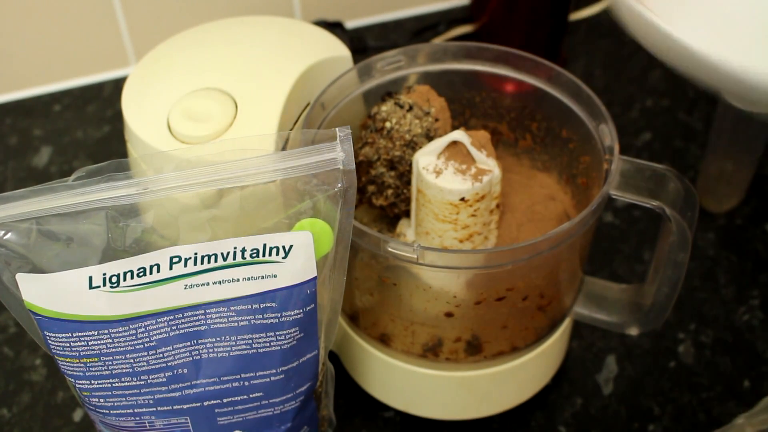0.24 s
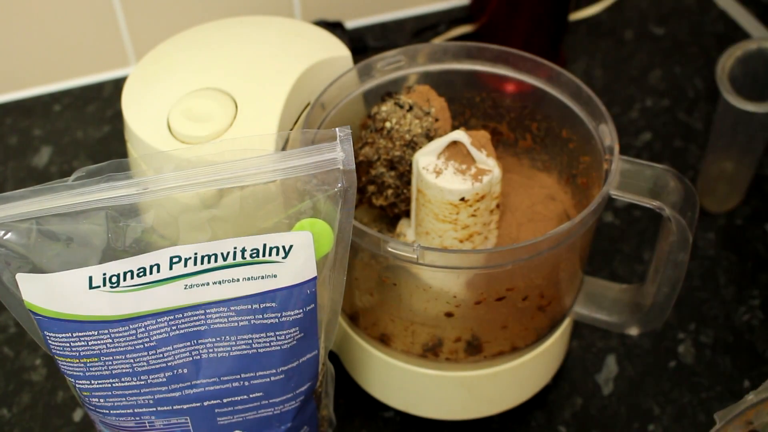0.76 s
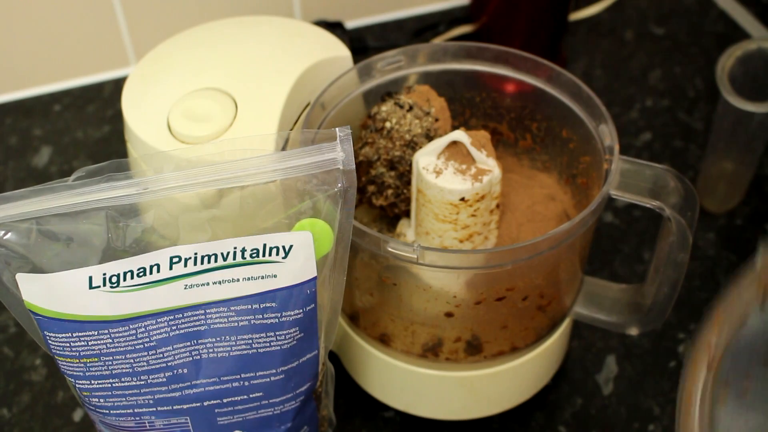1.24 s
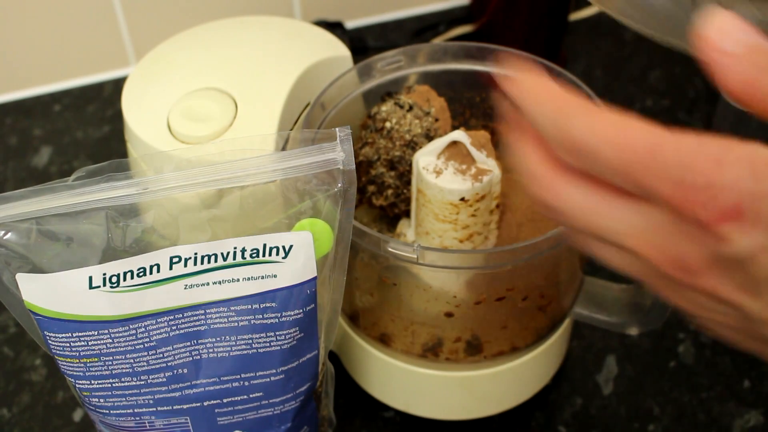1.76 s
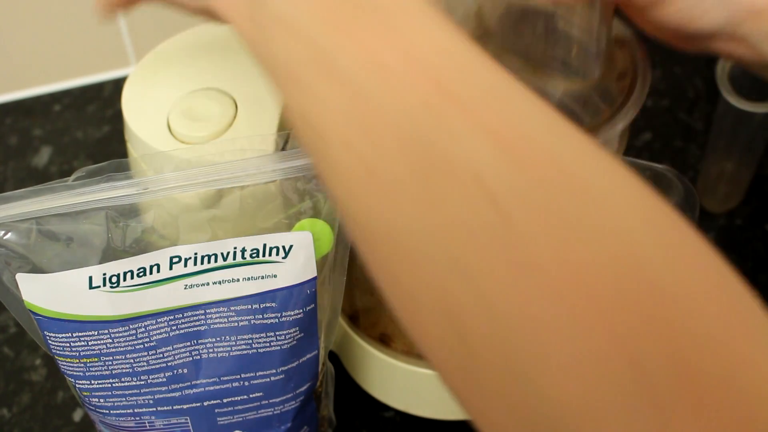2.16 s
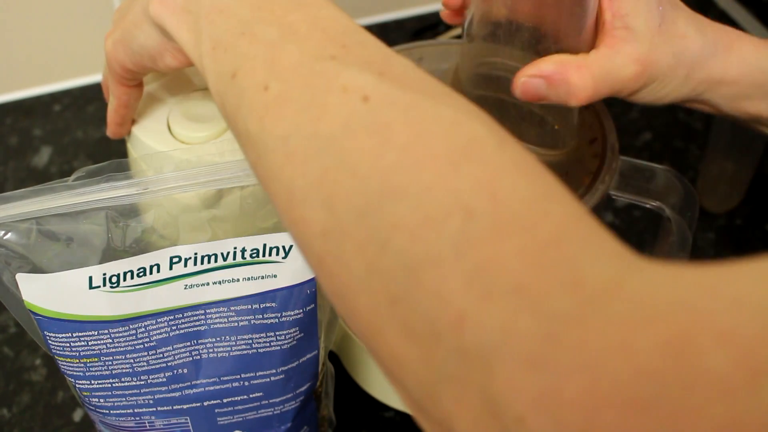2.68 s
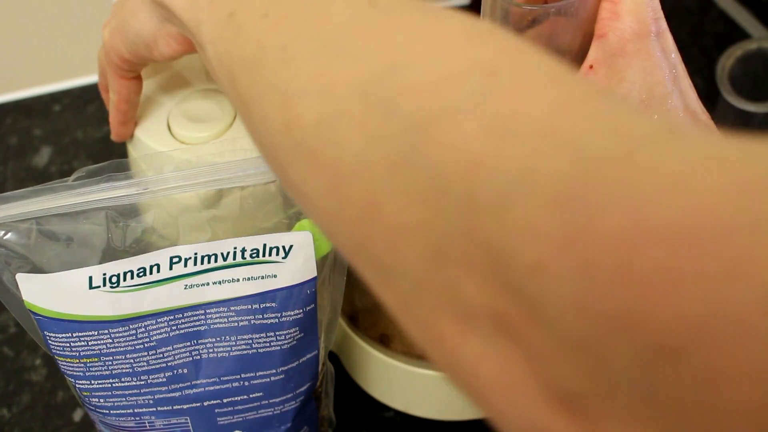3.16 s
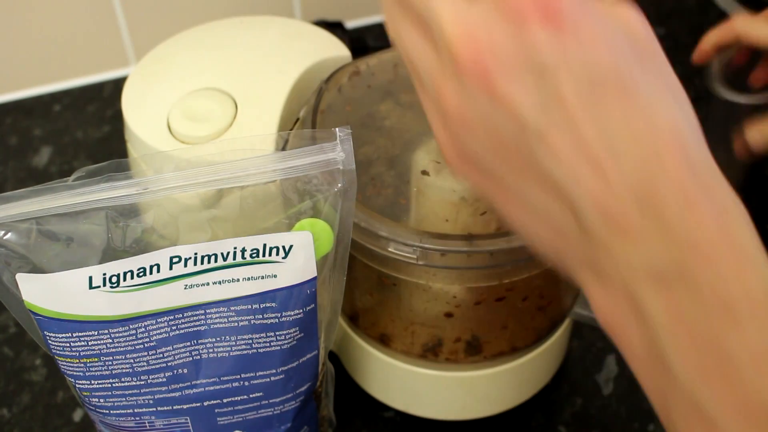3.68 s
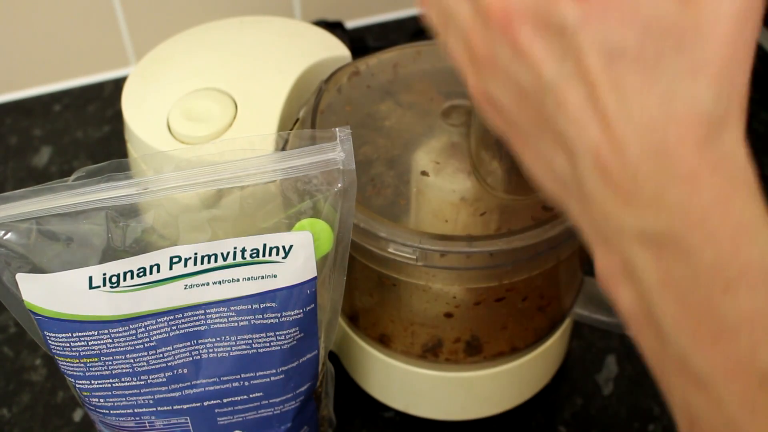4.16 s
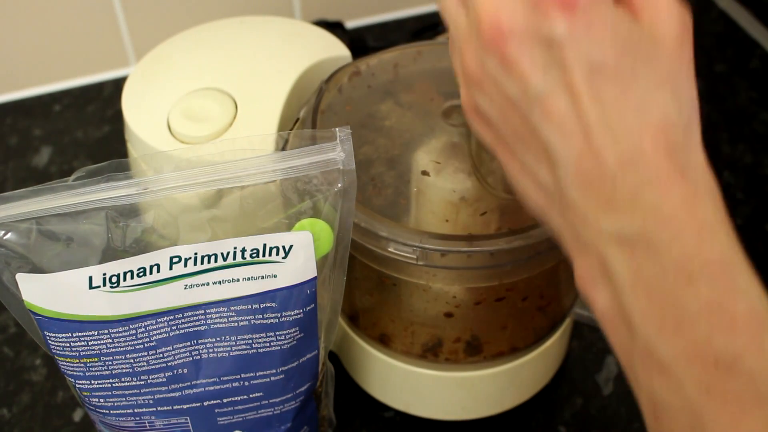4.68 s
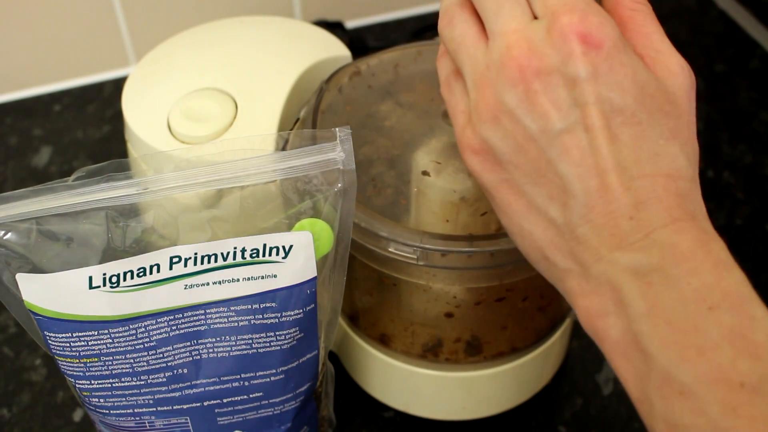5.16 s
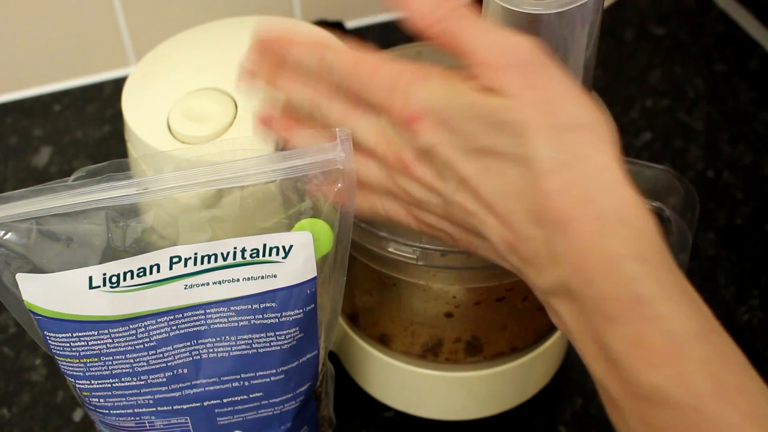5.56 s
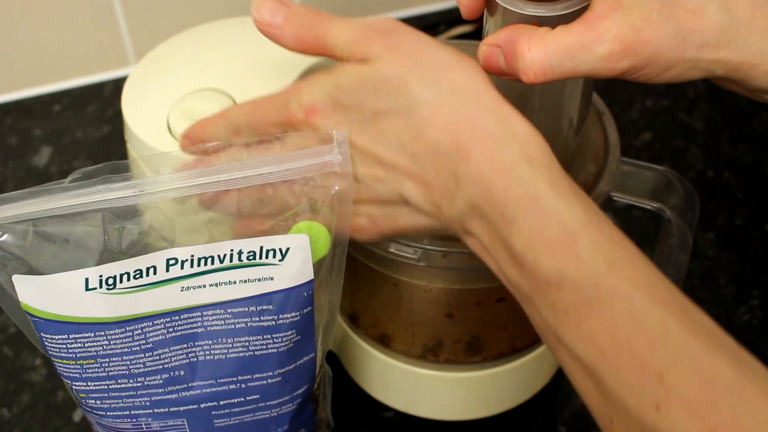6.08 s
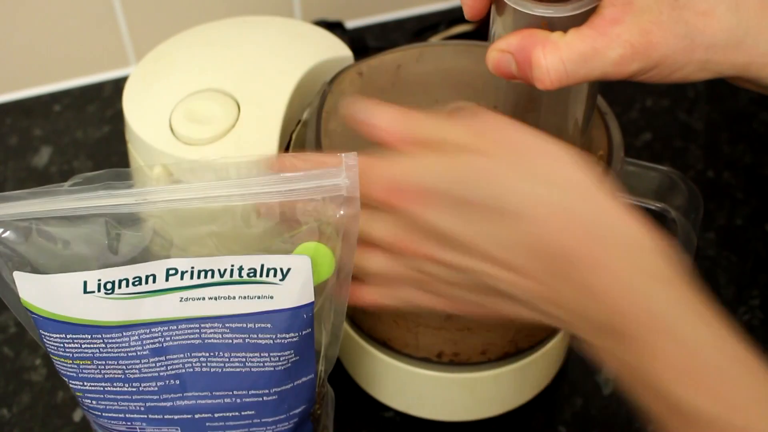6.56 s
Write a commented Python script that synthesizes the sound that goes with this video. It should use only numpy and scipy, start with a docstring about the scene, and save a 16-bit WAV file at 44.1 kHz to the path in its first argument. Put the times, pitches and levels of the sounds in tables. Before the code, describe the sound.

Close stereo handling of a food processor in a reverberant kitchen: quiet room hiss, a dull wobble of a dish, clusters of plastic lid knocks with soft rubbing, a quick hollow patter of the pusher, a sharp clack and scrape, a brief rattle and slide. Finally a firm click, and the loud motor runs up with a coarse rising whine over grainy churning.

```python
"""Food processor on a kitchen counter

A dish settles on the counter and a plastic lid is knocked and twisted onto the bowl: struck things ring.
The hollow pusher rocks on the counter, then scrapes and rattles in its tube; rubbing is a mass of tiny catches.
The lid clicks home and the motor runs up with a high whine, built from multiples of its shaft speed.
The blade throws crumbs and lumps at the bowl, and a close stereo microphone hears it in a hard, small room."""
import sys
import numpy as np
from scipy import signal
from scipy.fft import rfft, irfft
from scipy.io import wavfile
from scipy.ndimage import uniform_filter1d

SR = 44100
rng = np.random.default_rng(int(sys.argv[2]) if len(sys.argv) > 2 else 0)


def wav_record(signal):
    """Record a signal, one row per channel, as 16-bit PCM in the file named by sys.argv[1]."""
    frames = np.transpose(np.atleast_2d(signal))
    bounded = np.clip(frames, -1, 1)
    # unit amplitude maps onto the largest positive 16-bit level
    quanta = np.round(bounded * 32767).astype(np.int16)
    wavfile.write(sys.argv[1], SR, quanta)


N = 301235
TIME = np.arange(N) / SR  # [s]

# All event levels are set before the room; all spectrum and mode levels are relative.

# lines of the motor whine: (multiple of the shaft speed, level [dB])
WHINE_LINES = [(2, -19), (5, -33), (7, -11.5), (8, 0.5), (9, -10.5), (10, -6), (16, -15)]
# how the motor housing colours the whine: (frequency [Hz], level [dB])
HOUSING_COLOUR = [(100, -3), (1200, -2.5), (2400, 5), (2900, 4), (3200, 6), (3400, -6), (4400, 5),
                  (5000, -9)]
# how the churning crumbs are coloured: (frequency [Hz], level [dB])
CHURN_COLOUR = [(24, -61), (40, -38), (111, -10), (146, -10), (229, -2.5), (325, -3.5), (407, -11),
                (637, -8.5), (777, -15.5), (1100, -6.5), (2270, -9), (2840, -8), (4030, -14.5),
                (5710, -18.5), (15500, -38)]
# what the bowl rings with under the food: (frequency [Hz], level [dB], time to fade by 60 dB [s])
BOWL_MODES = [(114.5, -7.5, 0.58), (195.4, -3, 0.21), (235, -7.5, 0.21), (338, 11, 0.031),
              (535, -2.5, 0.096), (624, 4.5, 0.16), (1130, -7, 0.25), (1630, -27, 0.087)]
# lumps hit the bowl: (time [s], level [dB], hardness [dB], weight behind it [dB])
LUMP_BLOWS = [(6.133, -18.5, 0, -11), (6.16, -26, 1, -16), (6.197, -20, 3, -7), (6.255, -21.5, 5.5, -0.5),
              (6.5, -32, 0, 6.5), (6.565, -30, 14, 3), (6.739, -29, 9, -0.5)]

# knocks of the lid, and a faint handling tick at the start:
# (time [s], level [dB], hardness [dB], weight behind it [dB], chatter time [s])
LID_BLOWS = [(0.65, -55, -3, -16, .06), (1.263, -47, -1.5, -14, 0.12), (1.328, -51, 0, -8, 0.13),
             (2.302, -43, 0, 3.5, 0.083), (2.311, -32, -3, -6, 0.19), (2.384, -34, 0, -3, 0.17),
             (2.399, -20.5, -4.5, -13, 0.2), (2.472, -22, 1, -14.5, 0.081), (2.599, -31, 2.5, 3, 0.082),
             (2.632, -43.5, -8, 8.5, .12), (2.928, -37.5, 3, -33, .09), (3.063, -25.5, -4.5, -16, 0.055),
             (3.094, -33, -10, -13.5, 0.082), (3.326, -51, 0.5, 1.5, 0.1), (4.195, -19, 0.5, -8.5, 0.068),
             (4.314, -30, 3, -15, 0.12), (4.363, -31, -20, -13, .086), (4.61, -39.5, 0, -4.5, 0.17),
             (4.674, -39, 2, -13, 0.28), (4.704, -30.5, 1, -19, 0.27), (5.609, -40.5, -7, -7.5, 0.079),
             (5.758, -48, 7.5, -14, 0.6), (5.794, -29, 0, -15, 0.22), (5.821, -34, 7.5, -3, 0.16),
             (5.896, -35, 6.5, -30, 0.13), (6.022, -40, 2, -28, 0.13), (6.051, -42, 3.5, -20, 0.17),
             (6.078, -27.5, -3.5, -27, 0.078), (6.098, -18, 1.5, -8, 0.058)]
# what the lid rings with: (frequency [Hz], level [dB], time to fade by 60 dB [s])
LID_MODES = [(182, -1, 0.21), (213, 9.5, 0.08), (248, -5, 0.018), (527.7, -2.5, 0.29), (631, 0.5, 0.074),
             (1040, -2.5, 0.095), (1094, -4.5, 0.13), (1443, 4, 0.072), (2124, 13, 0.016),
             (2500, 12, 0.018), (3240, -24, .04)]
# scrapes as the lid is pressed down: (start [s], length [s], level [dB])
LID_STROKES = [(2.41, 0.1, -46), (2.605, 0.035, -35.5)]
# spectrum of those scrapes: (frequency [Hz], level [dB])
LID_COLOUR = [(70, -28), (200, 9.5), (330, 2), (700, -23), (1100, -1.5), (2600, -1), (5000, -16),
              (15000, -54)]
# soft rubs of hand and plastic: (start [s], length [s], level [dB])
HANDLING_STROKES = [(1.485, 0.045, -62.5), (1.655, 0.043, -55), (1.98, 0.16, -67), (2.765, 0.23, -45),
                    (3.295, .05, -61.5), (3.71, 0.038, -50), (5.575, 0.0063, -59)]
# spectrum of those soft rubs: (frequency [Hz], level [dB])
HANDLING_COLOUR = [(70, -33), (205, -1), (330, -10), (700, -11), (1500, -12.5), (2800, -14), (4500, -18.5),
                   (8000, -26), (15000, -34.5)]

# the pusher rocks on the counter: (time [s], level [dB])
COUNTER_BLOWS = [(3.671, -24.5), (3.685, -24), (3.703, -28), (3.715, -28)]
# the pusher rattles down the feed tube: (time [s], level [dB])
TUBE_BLOWS = [(4.823, -21.5), (4.839, -24), (4.861, -25.5), (4.885, -23.5), (4.895, -25)]
# what the pusher rings with: (frequency [Hz], level [dB], time to fade by 60 dB [s])
PUSHER_MODES = [(631, 2.5, 0.11), (737, 6.5, 0.071), (810, -12, 0.038), (1198, -0.5, 0.084),
                (1418, -28, 0.037), (2150, 13, 0.012), (3677, -11, 0.12)]
# the pusher scrapes in the tube: (start [s], length [s], level [dB])
TUBE_STROKES = [(4.215, 0.13, -35)]
# spectrum of the tube scrape: (frequency [Hz], level [dB])
TUBE_COLOUR = [(50, -43), (110, -12), (200, 4.5), (330, -6.5), (700, -12), (950, 1.5), (1120, 6),
               (1350, -9.5), (2300, -9), (4300, -18.5), (15000, -46)]
# the pusher slides home: (start [s], length [s], level [dB])
SLIDE_STROKES = [(5.251, 0.07, -36.5)]
# spectrum of the slide: (frequency [Hz], level [dB])
SLIDE_COLOUR = [(290, -46), (500, -21), (545, -22), (569, -26), (629, -19), (982, -20), (1270, -7),
                (1700, -18), (2070, -8.5), (3190, -5), (3790, -7.5), (5350, -7), (7450, -16.5),
                (15500, -45.5)]

# the dish settles: (time [s], level [dB])
DISH_BLOWS = [(0.867, -20), (0.897, -21.5), (0.972, -24), (1.026, -24.5), (1.071, -25.5), (1.104, -26.5)]
# what the dish rings with: (frequency [Hz], level [dB], time to fade by 60 dB [s])
DISH_MODES = [(260, -6.5, 0.1), (354, 6.5, 0.059), (413, 6, 0.064), (493, 7, 0.043), (542, 2.5, 0.1),
              (854, -2, 0.056), (916, -11, 0.66), (1650, -18, 0.064), (3570, -5, 0.081), (6650, 3.5, 0.34),
              (8650, 1, .25)]

# the thud, body, clack and tick registers of a blow: (from [Hz], to [Hz])
BLOW_BANDS = [(80, 400), (400, 1500), (1500, 4000), (4000, 15000)]
# spectrum of the push between two touching things: (frequency [Hz], level [dB])
CONTACT_COLOUR = [(50, -6.5), (200, 3.5), (450, 5), (1000, 5.5), (2600, -4.5), (4500, -13), (8000, -22.5),
                  (12000, -34.5), (16000, -46)]

# spectrum of the room hiss: (frequency [Hz], level [dB])
ROOM_TONE = [(25, -31), (60, -9.5), (130, -2), (210, -1), (300, 0), (450, 0.5), (800, -3), (1100, -8.5),
             (1800, -15), (3500, -18), (4600, -19), (5000, -27.5), (10000, -35), (15500, -37.5)]
# how long the room rings: (frequency [Hz], time to fade by 60 dB [s])
ROOM_T60 = [(100, 0.53), (300, 0.49), (750, 0.49), (2000, 0.6), (5000, 0.47), (9000, 0.54), (15000, 0.29)]
# how the left-right difference is coloured: (frequency [Hz], level [dB])
SIDE_COLOUR = [(50, -12), (130, -0.5), (300, -7.5), (1000, -5.5), (2000, -0.5), (4000, 0), (8000, 3),
               (15000, 5.5)]
# how the microphone softens the treble: (frequency [Hz], level [dB])
MICROPHONE_COLOUR = [(10000, 0), (15500, -10)]

# the motor spins up quickly, then keeps gaining speed as the food is chopped finer
SWITCH_ON_S, SPIN_UP_S = 6.091, 0.056
LOADED_HZ, GAIN_HZ_PER_S = 278.7, 128  # shaft turns per second, and how fast they keep rising
WHINE_DB, SURGE_DB, CHURN_DB = -42, 6, -31  # the surge is the extra whine while the shaft accelerates
ENGAGE_S, ENGAGE_RISE_S = 6.097, 0.033  # the blade bites into the food
TICK_PER_CLACK = 1.4  # a harder contact lifts the tick register this much faster than the clack
ROOM_TONE_DB = -64
EARLY_FROM_HZ = 360  # lower edge of the quick echoes
TOP_HZ = 15500  # the recorder keeps nothing much above this


def undb(db):
    """Decibels to gain."""
    return 10 ** (np.asarray(db) / 20)


def unit(x):
    """Scale to an average strength (rms) of 1."""
    return x / np.sqrt(np.mean(x ** 2))


def at_hz(points, hz):
    """Read a (frequency, value) table, with frequency on a log scale as in hearing."""
    f, value = np.transpose(points)
    return np.interp(np.log(np.maximum(hz, 1)), np.log(f), value)


def convolve(x, response):
    """Let every sample of x set off the response; keep the length of x."""
    return signal.fftconvolve(x, response)[:len(x)]


def colour(x, points, size=4096):
    """Filter x with the given spectrum without any sound arriving early (minimum phase)."""
    level = undb(at_hz(points, np.fft.rfftfreq(size, 1 / SR)))
    cepstrum = irfft(np.log(level))
    # folding the cepstrum puts the whole response after time zero
    cepstrum[1:size // 2] *= 2
    cepstrum[size // 2 + 1:] = 0
    return convolve(x, irfft(np.exp(rfft(cepstrum))))


def band(x, lo, hi, order=3):
    """Keep only the frequencies from lo to hi [Hz]."""
    return signal.sosfilt(signal.butter(order, [lo, hi], "band", fs=SR, output="sos"), x)


def fade(t, t60):
    """Die away steadily, 60 dB down after t60 [s]."""
    return np.exp(-np.log(1000) * t / max(t60, 1 / SR))


def walk(rate):
    """Smooth random drift with a spread near 1, aiming for a new value rate times a second."""
    k = max(int(SR / rate), 1)
    steps = np.repeat(rng.standard_normal(N // k + 1), k)
    smooth = uniform_filter1d(uniform_filter1d(steps, k), k)
    return 1.3 * smooth[:N]  # smoothing shrinks the spread


def grains(n, spread_db):
    """Dense tiny impacts, most weak and a few strong."""
    strength = np.minimum(rng.exponential(size=n), 4)
    return unit(rng.standard_normal(n) * undb(spread_db * strength))


def body(modes, ring_db):
    """Response of a struck thing: the contact itself plus its fading modes."""
    t = TIME[:SR // 2]
    ringing = sum(undb(db) * fade(t, t60) * np.cos(2 * np.pi * hz * t) for hz, db, t60 in modes)
    response = undb(ring_db) * ringing
    response[0] += 1
    return response


def blow(s, response, registers_db, chatter_s, snap, rise_s, hard_db=0, weight_db=0, size=350):
    """A snap and a short chatter of contacts; weight deepens the thud, hardness lifts clack and tick."""
    t = TIME[:SR // 2]
    # the contact pressure builds for a moment, then lets go
    push = grains(len(t), 0.95) * fade(t, chatter_s) * (1 - fade(t, rise_s))
    push[0] += snap
    ring = convolve(colour(push, CONTACT_COLOUR), response)
    levels_db = np.add(registers_db, (weight_db, 0, hard_db, TICK_PER_CLACK * hard_db))
    out = 0
    for (lo, hi), db in zip(BLOW_BANDS, levels_db):
        part = band(ring, lo, hi)
        # each register is set by its loudest stretch of size samples
        loudest = np.sqrt(uniform_filter1d(part ** 2, size, mode="constant").max())
        out = out + undb(db) * part / loudest
    return np.pad(out, (int(s * SR), N))[:N]


def rub(strokes, spectrum, attack_s, release_s, grain_db, slip_hz, slip_db):
    """Rubbing surfaces: strokes swell, hold and die; tiny catches bunch up as they stick and slip."""
    pressure = 0
    for s, length, db in strokes:
        swell = fade(np.maximum(s - TIME, 0), attack_s)
        release = fade(np.maximum(TIME - s - length, 0), release_s)
        pressure = pressure + undb(db) * swell * release
    catches = grains(N, grain_db) * undb(slip_db * walk(slip_hz))
    return unit(colour(catches, spectrum)) * pressure


def motor(wobble=0.00807, flutter_db=4.0, rasp=1.27, rasp_hz=330, blade_share=0.085, throb=0.21):
    """The shaft runs up and whines through the housing; the geared-down blade flings crumbs at the bowl."""
    age = np.maximum(TIME - SWITCH_ON_S, 0)
    lag = np.exp(-age / SPIN_UP_S)
    speed = LOADED_HZ * (1 - lag) + GAIN_HZ_PER_S * age
    running = np.clip((TIME - ENGAGE_S) / ENGAGE_RISE_S, 0, 1)
    # the uneven load shakes the speed
    turns = np.cumsum(speed * (1 + wobble * walk(110))) / SR

    whine = 0
    for multiple, db in WHINE_LINES:
        # play in the drive smears every line into a rough strand
        strand = 1 + rasp * (walk(rasp_hz) + 1j * walk(rasp_hz))
        line = np.real(strand * np.exp(2j * np.pi * round(multiple) * turns))
        whine = whine + undb(db + flutter_db * walk(60)) * line
    whine = colour(whine, HOUSING_COLOUR) * undb(WHINE_DB + SURGE_DB * lag)

    # blade_share is blade turns per shaft turn; two arms give two sweeps per blade turn
    sweep = 1 + throb * np.sin(2 * np.pi * 2 * blade_share * turns)
    hits = grains(N, 2.24) * sweep * undb(0.94 * walk(40))
    crumbs = convolve(hits, body(BOWL_MODES, ring_db=-48.5))
    churn = unit(colour(crumbs, CHURN_COLOUR)) * undb(CHURN_DB)
    return running * (whine + churn)


def lumps():
    """The blade throws lumps of food against the bowl, which rings at each hit."""
    response = body(BOWL_MODES, ring_db=-43)
    return sum(undb(db) * blow(s, response, registers_db=(-6, -8, -15.5, -26.5), chatter_s=0.033,
                               snap=0.63, rise_s=0.015, hard_db=hard, weight_db=weight)
               for s, db, hard, weight in LUMP_BLOWS)


def lid():
    """After a faint handling tick the lid knocks and scrapes; hand and plastic rub softly."""
    response = body(LID_MODES, ring_db=-48.5)
    knocks = sum(undb(db) * blow(s, response, registers_db=(0, -6.5, -9, -21.5), chatter_s=chatter,
                                 snap=5.4, rise_s=0.0076, hard_db=hard, weight_db=weight)
                 for s, db, hard, weight, chatter in LID_BLOWS)
    scrape = rub(LID_STROKES, LID_COLOUR, attack_s=0.039, release_s=0.4,
                 grain_db=1.5, slip_hz=162.6, slip_db=-1.2)
    handling = rub(HANDLING_STROKES, HANDLING_COLOUR, attack_s=0.22, release_s=0.26,
                   grain_db=0.5, slip_hz=131.5, slip_db=2.0)
    return knocks + scrape + handling


def pusher(harden_db_per_s=290):
    """The pusher rings freely on the counter, harder each time; in the tube its ring is held down."""
    free = body(PUSHER_MODES, ring_db=-30)
    damped = body(PUSHER_MODES, ring_db=-38.5)
    first_s = COUNTER_BLOWS[0][0]
    rocking = sum(undb(db) * blow(s, free, registers_db=(-21, -4.0, -26, -35.5), chatter_s=0.044,
                                  snap=0.69, rise_s=0.04, hard_db=harden_db_per_s * (s - first_s))
                  for s, db in COUNTER_BLOWS)
    rattle = sum(undb(db) * blow(s, damped, registers_db=(-16, -5.5, -12.5, -24.5), chatter_s=0.064,
                                 snap=3.6, rise_s=0.024)
                 for s, db in TUBE_BLOWS)
    scrape = rub(TUBE_STROKES, TUBE_COLOUR, attack_s=0.067, release_s=0.83,
                 grain_db=2.5, slip_hz=119.9, slip_db=2.5)
    slide = rub(SLIDE_STROKES, SLIDE_COLOUR, attack_s=0.023, release_s=0.4,
                grain_db=1.0, slip_hz=393, slip_db=3)
    return rocking + rattle + scrape + slide


def dish():
    """The dish wobbles to rest with dull blows that all ring alike."""
    response = body(DISH_MODES, ring_db=-36.5)
    return sum(undb(db) * blow(s, response, registers_db=(-2.5, -4.5, -26, -48.5), chatter_s=0.15,
                               snap=4.4, rise_s=0.021)
               for s, db in DISH_BLOWS)


def reflections(early_db, early_t60, late_db):
    """Quick echoes from counter and tiles, then the diffuse tail of the kitchen."""
    t = TIME[:SR]
    edges = np.geomspace(50, 16000, 10)  # [Hz]
    noise = rng.standard_normal(SR)
    tail = 0
    for lo, hi in zip(edges, edges[1:]):
        t60 = at_hz(ROOM_T60, np.sqrt(lo * hi))
        tail = tail + band(noise, lo, hi, order=2) * fade(t, t60)
    tail = tail * (1 - fade(t, 0.065))  # the tail builds up gradually
    # the nearby surfaces are too small to throw back the bass
    echoes = grains(SR, 5.03) * fade(t, early_t60) * (t > 0.001)
    early = band(echoes, EARLY_FROM_HZ, SR * 0.45, order=1)
    return (undb(early_db) * unit(early) + undb(late_db) * unit(tail)) / np.sqrt(SR)


def room_hiss():
    """Steady coloured noise whose level drifts slightly."""
    noise = unit(colour(rng.standard_normal(N), ROOM_TONE))
    return noise * undb(ROOM_TONE_DB + 0.35 * walk(4.7))


def kitchen(sounds):
    """Direct sound is shared by both sides; echoes and hiss differ left and right, mostly in the treble."""
    mid = room_hiss()
    side_hiss = room_hiss()
    side_echoes = 0
    for sound in sounds:
        direct = undb(-2.5) * sound
        shared_echoes = convolve(sound, reflections(early_db=-12, early_t60=0.07, late_db=-7))
        mid = mid + direct + shared_echoes
        side_echoes = side_echoes + convolve(sound, reflections(early_db=-9.5, early_t60=0.038, late_db=-14.5))
    side = colour(side_echoes + undb(1) * side_hiss, SIDE_COLOUR)
    balance_db = 0.59  # right is up and left is down by this much
    return np.array([(mid + side) * undb(-balance_db), (mid - side) * undb(balance_db)])


def scene():
    """Motor, lumps, lid, pusher and dish, all in one room."""
    return kitchen([motor(), lumps(), lid(), pusher(), dish()])


def record(dry):
    """The microphone softens the highest treble and the recorder cuts the top."""
    heard = np.array([colour(channel, MICROPHONE_COLOUR) for channel in dry])
    return signal.sosfilt(signal.ellip(10, 0.2, 80, TOP_HZ, fs=SR, output="sos"), heard)


dry = scene()
out = record(dry)
wav_record(out)
```